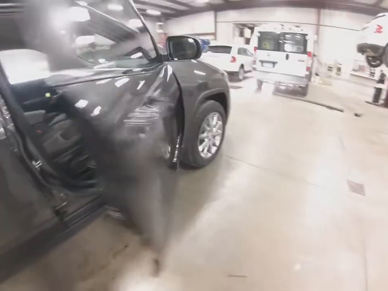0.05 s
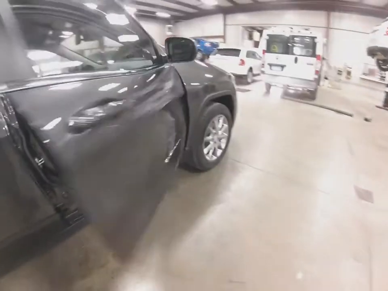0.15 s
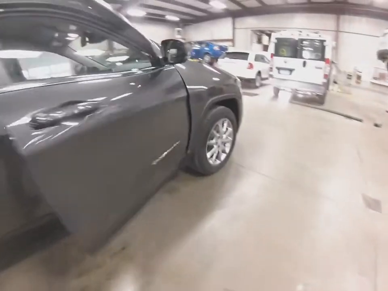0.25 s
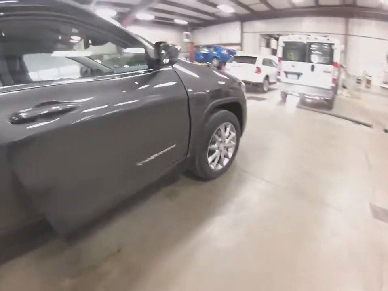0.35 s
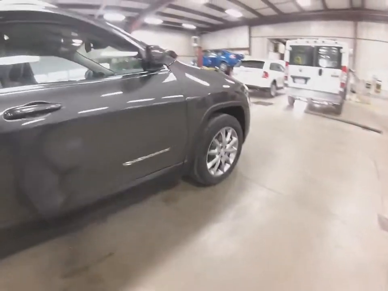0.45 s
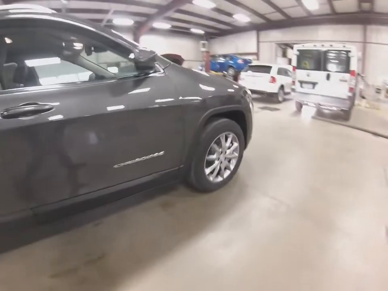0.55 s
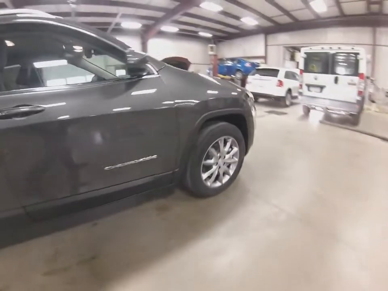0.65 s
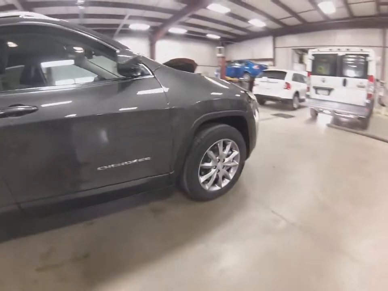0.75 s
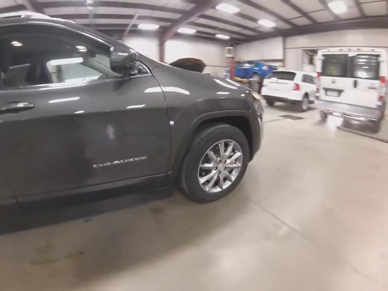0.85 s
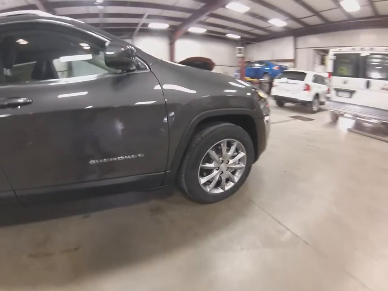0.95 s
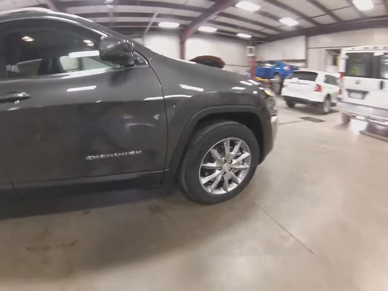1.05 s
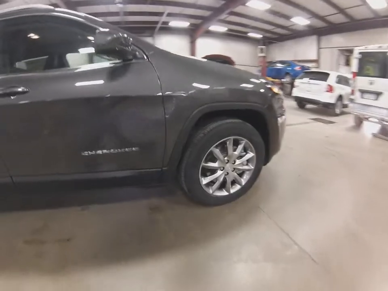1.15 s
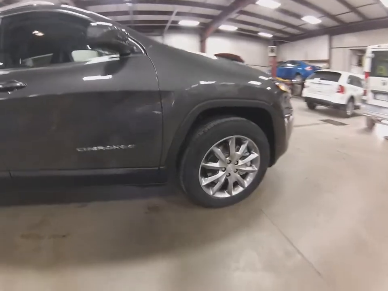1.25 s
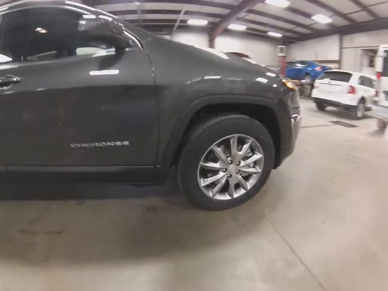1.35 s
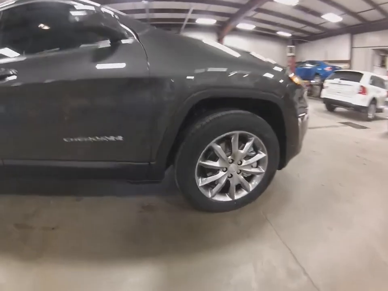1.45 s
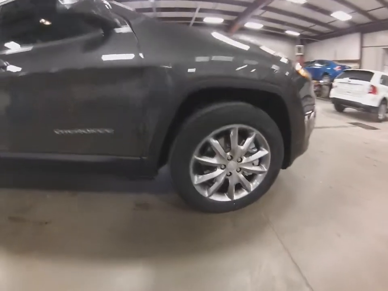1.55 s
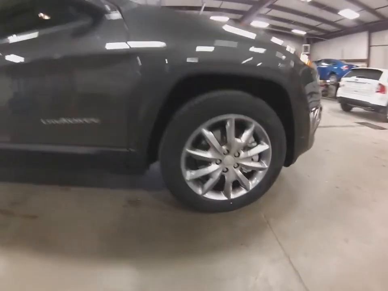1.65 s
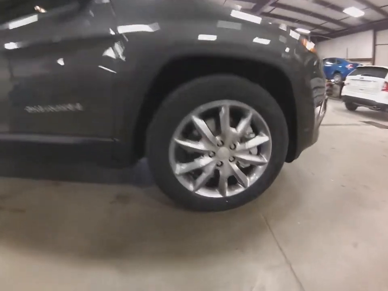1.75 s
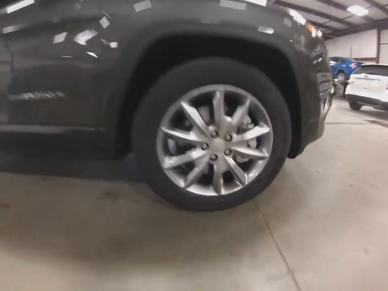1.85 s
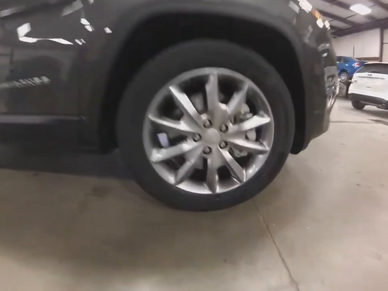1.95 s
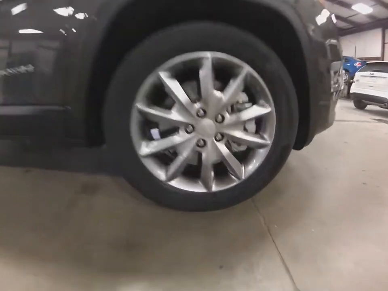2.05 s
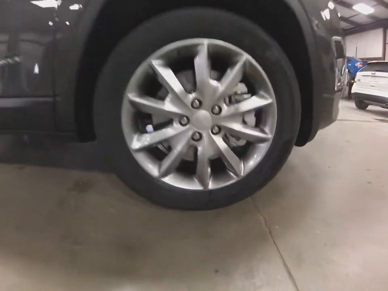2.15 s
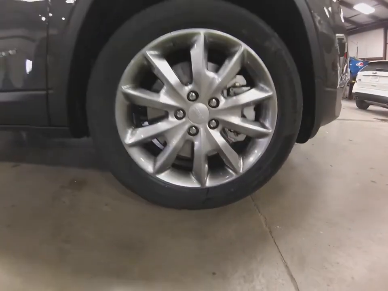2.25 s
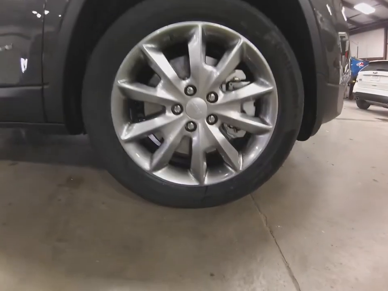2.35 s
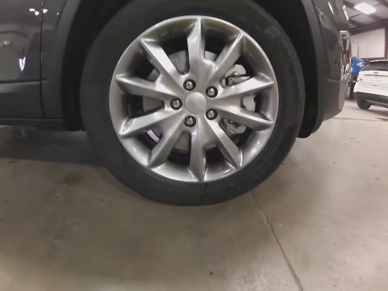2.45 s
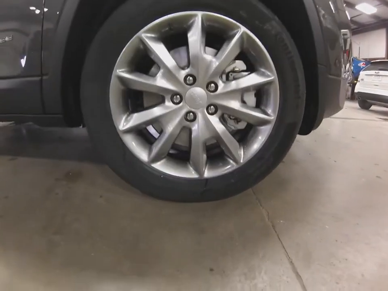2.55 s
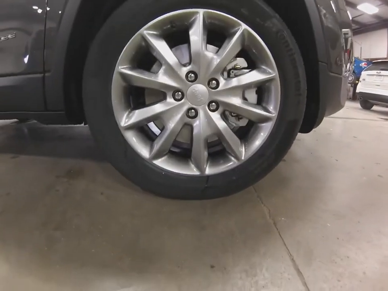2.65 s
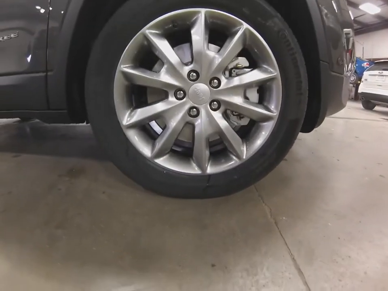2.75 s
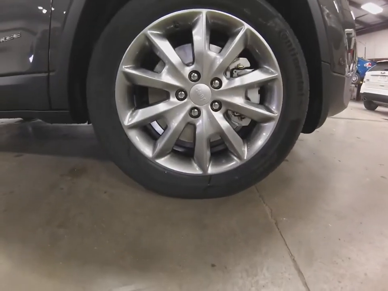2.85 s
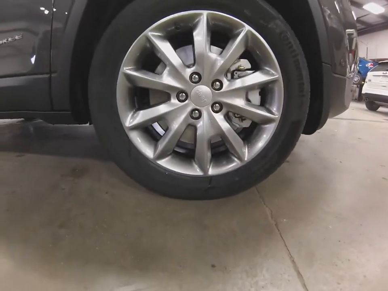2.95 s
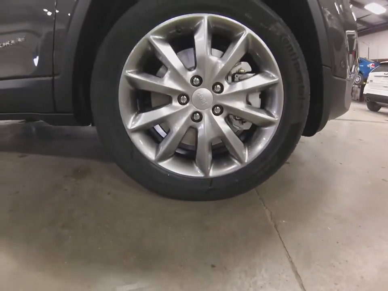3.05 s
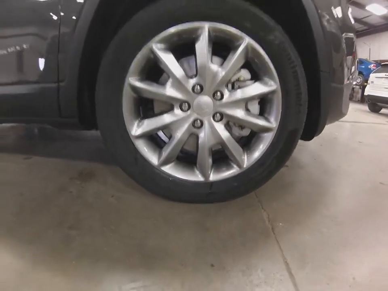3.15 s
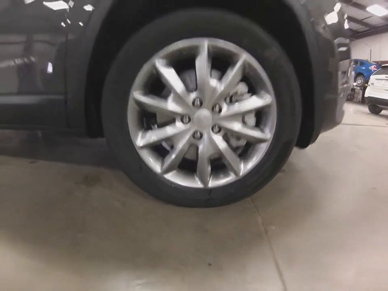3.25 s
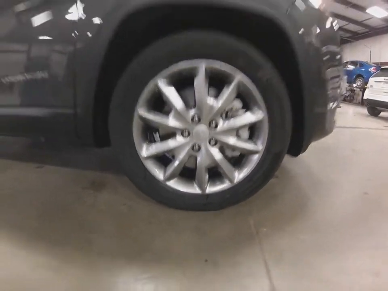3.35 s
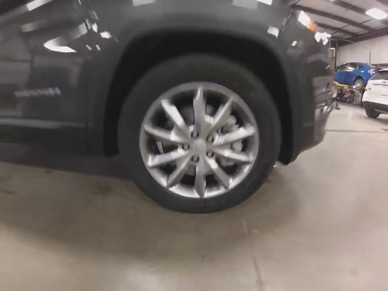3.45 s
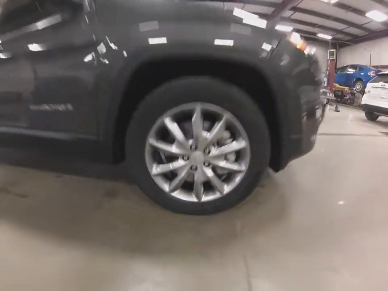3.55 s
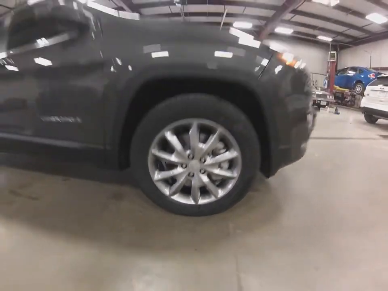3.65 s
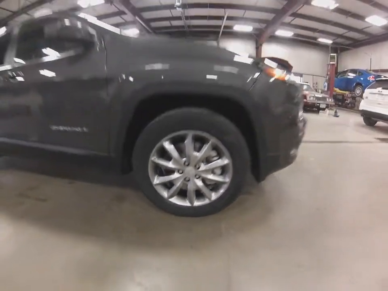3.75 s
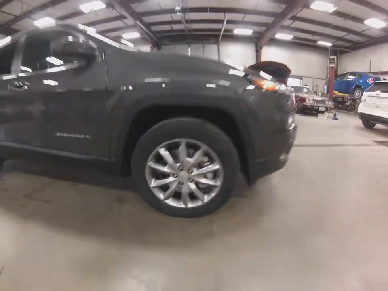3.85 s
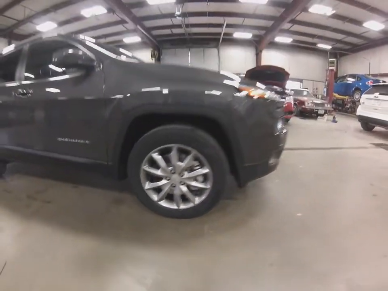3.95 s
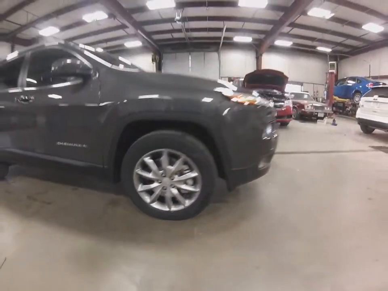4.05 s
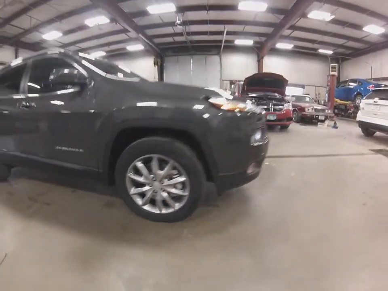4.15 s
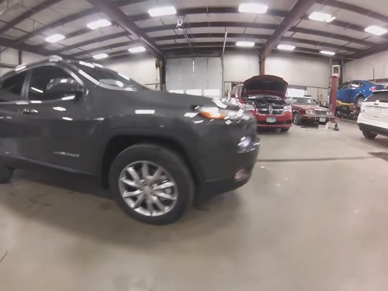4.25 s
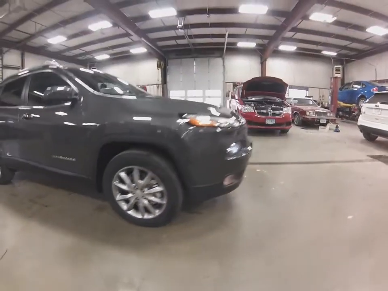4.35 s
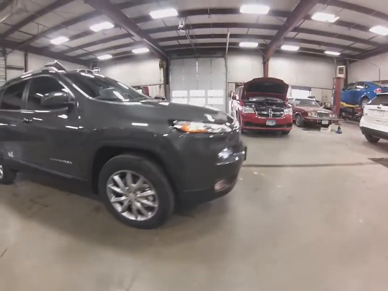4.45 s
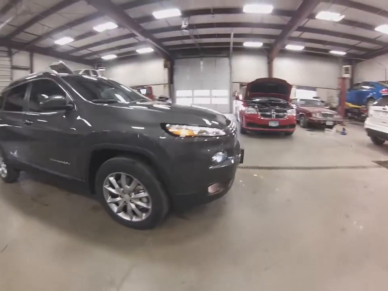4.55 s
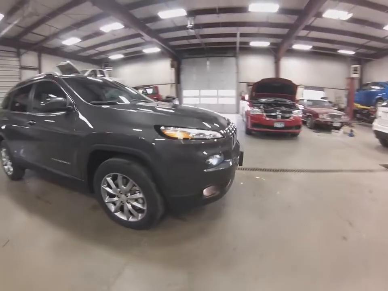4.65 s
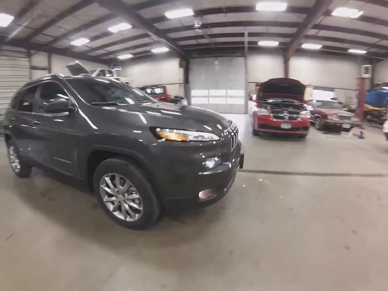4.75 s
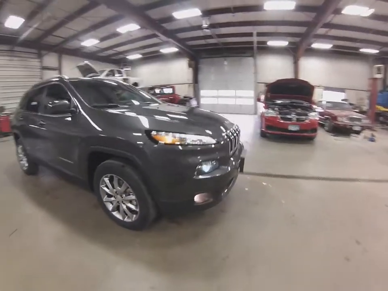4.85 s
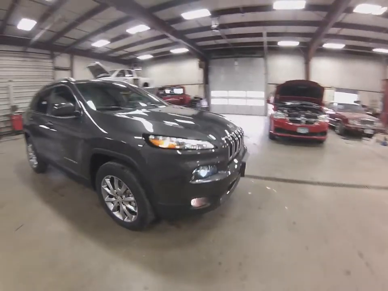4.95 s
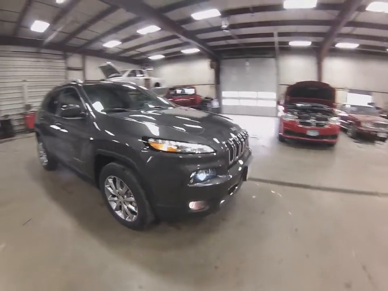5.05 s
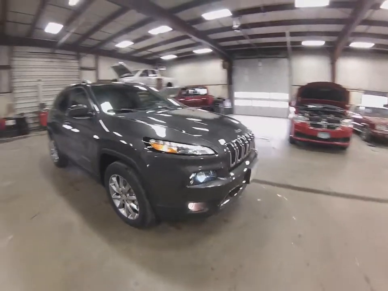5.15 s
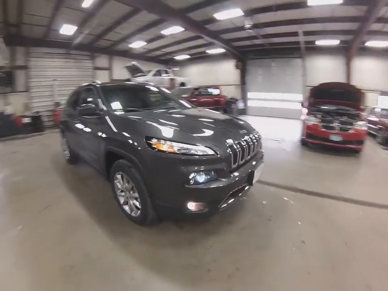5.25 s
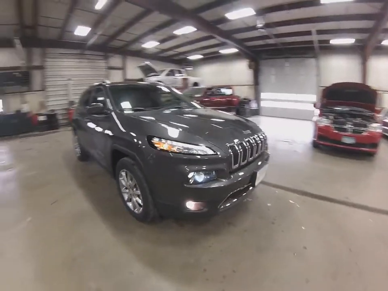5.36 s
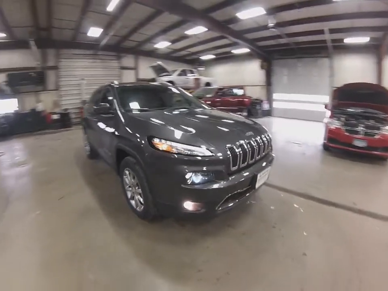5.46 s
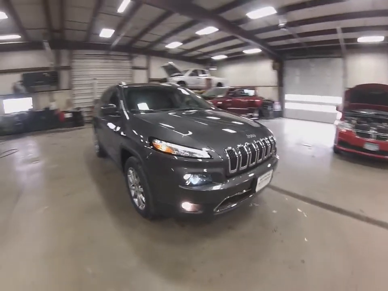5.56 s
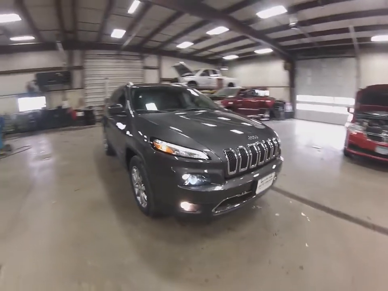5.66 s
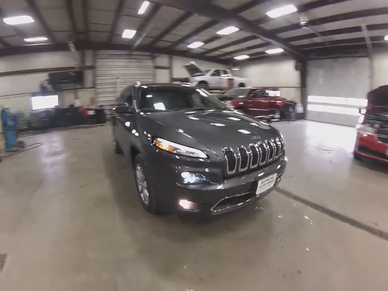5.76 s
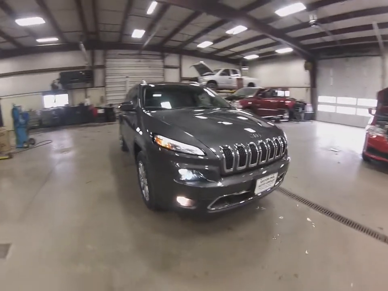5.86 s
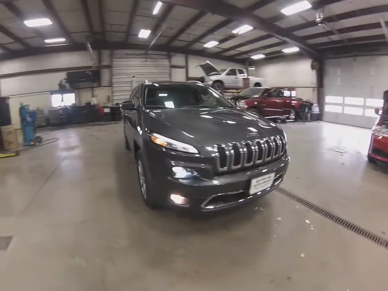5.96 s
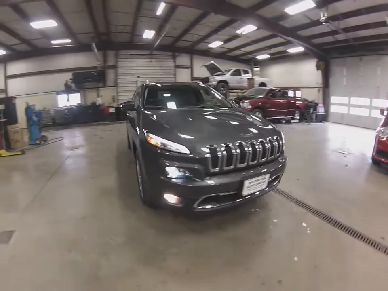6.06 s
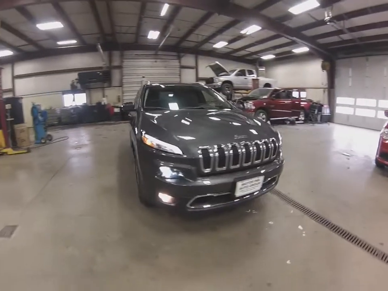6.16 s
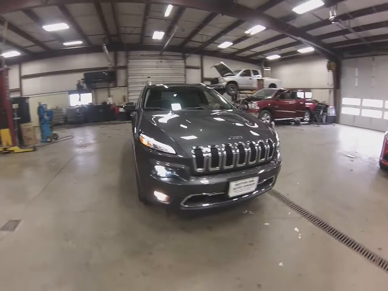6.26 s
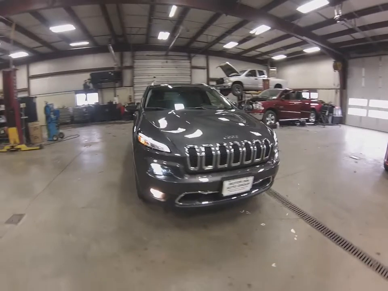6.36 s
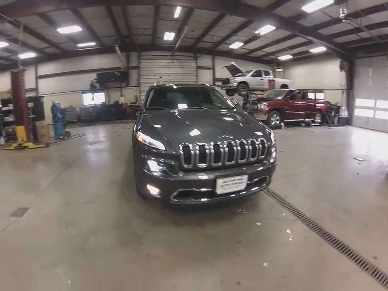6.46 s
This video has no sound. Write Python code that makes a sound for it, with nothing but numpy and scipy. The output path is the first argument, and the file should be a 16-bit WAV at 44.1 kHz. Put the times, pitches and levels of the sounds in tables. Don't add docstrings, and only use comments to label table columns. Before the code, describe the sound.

A car door slams with a hard, clipped thud in a large workshop, then an idling engine hisses and ticks nearby amid clinking keys and bumps.

```python
import sys
import numpy as np
from scipy import signal
from scipy.io import wavfile
from scipy.ndimage import uniform_filter1d

SR = 44100
rng = np.random.default_rng(int(sys.argv[2]) if len(sys.argv) > 2 else 0)


def boost(x):
    u = np.asarray(x, float) / 20
    return 10 ** u


def transcribe(u):
    v = np.clip(np.atleast_2d(u).T, -1, 1)
    q = np.round(v * 32767).astype(np.int16)
    wavfile.write(sys.argv[1], SR, q)


N = 287046

# frequency in Hz, rms level in dB.
HALL_HUM = [(431, -64), (600, -65.5)]
# frequency in Hz, density in dB per Hz.
RUMBLE_SPECTRUM = [(12, 5.5), (25, -7), (60, -0.5), (100, -12.5), (160, -14.5), (250, -45), (400, -17)]
# frequency in Hz, density in dB per Hz.
HALL_SPECTRUM = [(120, -21), (180, -4.5), (300, -5.5), (430, -10.5), (520, -23), (620, -12.5), (800, -21),
                 (1200, -9), (1800, -16), (3000, -20), (5000, -20), (7500, -27.5), (11000, -31.5),
                 (15500, -32)]
HALL_DB, SHADOW_DB, RUMBLE_DB, RUMBLE_FADE_DB_PER_S = -49.5, -1, -41, -0.23
ECHO_T60_S, ECHO_DB, ECHO_CUT_HZ = .7, -28, 300

# time in seconds, engine bay level in dB.
WALK = [
    (0, -52.5),
    (.8, -50.5),
    (1.6, -46.5),
    (2.2, -42.5),
    (3.45, -43.5),
    (3.85, -49),
    (4.5, -52),
    (5.2, -56),
    (6, -53.5),
    (6.51, -55),
]
NEAREST_DB = -43
BRIGHT_DB_PER_OCTAVE, BRIGHT_LOSS_PER_DB = 0.85, 0.2855

FIRING_HZ = 37.53
PHASE_SCATTER_CYCLES = .15
# firing order, rms level close by in dB, share of the bay's fall with distance.
BLOCK = [(3, -41, 0.79), (5, -51, 1)]
# firing order, level against order 3 in dB.
FOLLOWERS = [(.5, -16), (1.5, -12), (2, -4.0), (2.5, -14), (3.1667, -13), (3.5, -14), (4, -14), (7, -21),
             (7.5, -13), (15.36, -21)]
# time in seconds, rms level in dB.
GRILLE = [(0, -59.5), (.5, -57), (1, -70.5), (2, -53.5), (2.65, -62), (3.6, -51), (4.3, -56.5),
          (5.2, -49.5), (5.6, -57.5), (6, -48), (6.51, -48.5)]
EXHAUST_DB, EXHAUST_FADE_DB_PER_S = -38.5, -0.44

# frequency in Hz, density in dB per Hz.
BAY_SPECTRUM = [(160, -53), (220, -8.5), (350, -15), (600, -5), (950, -8.5), (1450, -10.5), (2200, -12),
                (3200, -13), (5000, -18.5), (7000, -27.5), (8500, -37), (10500, -27), (13500, -27.5),
                (15500, -28)]
# frequency in Hz, width in Hz, level in dB.
BAY_RINGS = [(600, 40, -15), (800, 35, -17), (1130, 50, -15), (1465, 40, -11), (1800, 40, -16),
             (2100, 40, -18), (3080, 130, -13), (7750, 50, -29)]
FIRST_TICK_S, TICK_DB, WEAK_TICK_DB, TICK_T60_S = .099, -1.5, -3.5, .04

# time in seconds, peak in dB, frequency in Hz, t60 in seconds.
THUMPS = [(3.481, -29, 45, .16), (3.611, -25, 32, 0.22), (4.251, -18, 46.2, .2), (4.322, -11.5, 75, 0.047),
          (4.411, -21.5, 54.7, 0.1), (4.537, -18.5, 50, 0.085), (4.879, -41, 70.5, .15),
          (5.488, -25, 56, .15), (5.577, -23, 60, 0.089), (5.789, -23, 50.4, 0.12), (6.115, -21.5, 73, .11)]
# time in seconds, peak in dB, frequency in Hz.
TAPS = [(0.647, -28, 131), (.695, -31, 153), (1.734, -45, 350), (4.283, -22, 139), (4.2965, -23, 210),
        (4.305, -26, 147), (4.352, -25.5, 120), (4.370, -30.5, 236), (4.388, -29, 174), (4.435, -31, 240),
        (4.49, -44, 162), (5.55, -32, 170), (6.135, -26.5, 148), (6.15, -38, 210)]
TAP_T60_CYCLES = 8.3
# time in seconds, peak in dB, frequency in Hz.
CLINKS = [
    (1.6342, -40, 9800),
    (2.6374, -30, 10070),
    (2.6374, -49, 9700),
    (2.6374, -50, 14000),
    (3.0594, -37, 9750),
    (3.073, -47, 9800),
    (3.073, -42, 8050),
    (3.073, -49, 11200),
]
# time in seconds, peak in dB, frequency in Hz.
CHIMES = [
    (3.056, -44, 11500),
    (3.2094, -45, 12000),
    (3.25, -59, 8600),
]
CLINK_T60_S, CHIME_T60_S = 0.09, .3
# frequency in Hz, level in dB, t60 in seconds.
RATTLE_MODES = [(5670, 1, .014), (6300, 1, 0.013), (7300, -9, .01), (8600, -10, .01), (13200, -12, .01)]
RATTLE_S, RATTLE_GAP_S, RATTLE_PEAK_S = 6.104, .0165, 6.187
RATTLE_DB, RATTLE_FALL_DB_PER_S = -43, 130.0

# time in seconds, level in dB, t60 in seconds, low edge in Hz, high edge in Hz.
CRACKS = [(0.527, -32, 0.052, 1900, 3630), (0.5265, -29, 0.076, 447, 1200),
          (0.5373, -21, 0.024, 2490, 8800), (0.544, -22.5, 0.043, 500, 1540),
          (0.541, -33, 0.028, 1800, 11000), (0.549, -38, 0.03, 1500, 12000), (0.555, -37.5, 0.34, 300, 800),
          (4.28, -53, 0.67, 250, 2200), (.558, -54, 1, 450, 2380), (6.10, -60, 0.56, 4500, 9000),
          (6.17, -59, 0.63, 4500, 8000)]
# frequency in Hz, width in Hz, rms level in dB.
JINGLE_RINGS = [(5750, 400, -70), (8650, 400, -68), (12100, 400, -70)]
# start, peak and end in seconds.
SWING_S = (.42, .48, .56)

# frequency in Hz, level in dB, t60 in seconds.
LATCH_MODES = [(1350, -16, 0.019), (1437, -17.5, 0.054), (1730, -19, 0.014), (800, -21.5, .06),
               (516, -14, 0.041)]
# time in seconds, level in dB.
LATCH_HITS = [
    (.5254, -8),
    (.5261, -3),
    (.5268, -1),
    (.5282, -5),
    (.5342, -9),
]
# time in seconds, height, length in milliseconds.
PUSHES = [
    (.5318, .3, 9.5),
    (.5391, -.95, 2.2),
    (.5416, -.5, 1.9),
    (.5502, .24, 8.5),
    (.567, -.08, 10.0),
    (.585, .15, 10.0),
    (1.7329, -.055, .6),
    (1.7335, .04, 1.3),
]
SEAL_S, SEAL_DAMPING_S = .5391, .006
# frequency in Hz, level in dB, t60 in seconds.
BODY_MODES = [(32, -9.5, 0.2), (60, -42, 0.24), (120, -33, 0.15), (192.4, -34, 0.83), (306, -26, 0.19),
              (400, -24, 0.11), (551, -23.5, 0.084), (737, -12.5, 0.028)]
# time in seconds, peak in dB.
WOBBLE = [
    (.604, -18),
    (0.639, -31),
    (.676, -15.5),
    (0.724, -11.5),
    (0.78, -16.5),
    (0.812, -21),
]
WOBBLE_HZ, SAG_HZ_PER_S, WOBBLE_T60_S = 54, 63, 0.13

DUCK_DB, DUCK_S, HOLD_S, RECOVER_S = -4.5, 0.563, 0.061, 0.028
CUTOFF_HZ, PART_SAMPLES = 15400, 1024
PART_SHARE, PART_LOW_DB, PART_HIGH_DB = 0.33, -34.5, -23
PART_START_S, PART_END_S = .53, .76


def rms_one(x):
    return x / np.sqrt(np.mean(x ** 2) + 1e-20)


def in_time(rows):
    s, *columns = np.transpose(rows)
    return [np.interp(np.arange(N) / SR, s, c) for c in columns]


def drift(rate):
    r = np.exp(-80 * np.pi * rate / SR)
    white = rng.standard_normal(N // 40 + 2002)
    slow = signal.lfilter([1], [1, -2 * r, r * r], white)[2000:]
    return np.interp(np.arange(N) / 40, np.arange(len(slow)), rms_one(slow - slow.mean()))


def filtered(x, order, hz, kind):
    return signal.sosfilt(signal.butter(order, hz, kind, fs=SR, output="sos"), x)


def resonate(x, hz, width_hz):
    r = np.exp(-np.pi * width_hz / SR)
    return rms_one(signal.lfilter([1, 0, -1], [1, -2 * r * np.cos(2 * np.pi * hz / SR), r * r], x))


def add_ring(out, s, db, hz, t60_s, rise_cycles=0.0, phase=0):
    start = round(s * SR)
    t = np.arange(min(int(t60_s * 1.5 * SR), N - start)) / SR
    swell = 1 - np.exp(-t * hz / max(rise_cycles, 1e-3))
    out[start:start + len(t)] += boost(db - 60 * t / t60_s) * swell * np.sin(2 * np.pi * hz * t + phase)


def banded_noise(spectrum, patchy_db, tilt_db=0):
    together, white = drift(1.4), rng.standard_normal((2, N))
    hz, db = np.transpose(spectrum)
    edges_hz = np.geomspace(hz[0], hz[-1], round(2.5 * np.log2(hz[-1] / hz[0])) + 1)
    out, power = 0, 0
    for k, (low_hz, high_hz) in enumerate(zip(edges_hz, edges_hz[1:])):
        band = filtered(white[k % 2], 2, [low_hz, high_hz], "band")
        middle_hz = np.sqrt(low_hz * high_hz)
        level_db = np.interp(np.log(middle_hz), np.log(hz), db)
        power += boost(2 * level_db) * np.mean(band ** 2)
        flicker_db = patchy_db * (0.3 * together + drift(14.5))
        out = out + band * boost(level_db + tilt_db * np.log2(middle_hz / 2000) + flicker_db)
    return out / np.sqrt(power)


def hall_hum():
    out = np.zeros(N)
    for hz, db in HALL_HUM:
        phase = 2 * np.pi * np.cumsum(hz * (1 + 0.0022 * drift(3.2))) / SR
        out += np.sqrt(2) * boost(db + 4 * drift(3.3)) * np.sin(phase)
    return out


def hall_noise(bay_db):
    hall_db = HALL_DB + SHADOW_DB * boost(bay_db - NEAREST_DB)
    rumble_db = RUMBLE_DB + RUMBLE_FADE_DB_PER_S * np.arange(N) / SR
    hall = boost(hall_db) * banded_noise(HALL_SPECTRUM, patchy_db=0.9)
    return hall + boost(rumble_db) * banded_noise(RUMBLE_SPECTRUM, patchy_db=1.0)


def workshop_echo(x):
    t = np.arange(int(ECHO_T60_S * SR)) / SR
    dull = filtered(rng.standard_normal(len(t)), 2, [60, ECHO_CUT_HZ], "band")
    tail = dull * boost(-60 * t / ECHO_T60_S) * (t > .02)
    return boost(ECHO_DB) * signal.fftconvolve(x, tail / np.sqrt(np.sum(tail ** 2)))[:N]


def engine_tones(bay_db):
    turn = 2 * np.pi * np.cumsum(FIRING_HZ * (1 + 0.0023 * drift(2.76))) / SR
    block = [(round(k), db + share * (bay_db - NEAREST_DB)) for k, db, share in BLOCK]
    orders = [(1, EXHAUST_DB + EXHAUST_FADE_DB_PER_S * np.arange(N) / SR), *block, (8, *in_time(GRILLE))]
    orders += [(k, block[0][1] + db) for k, db in FOLLOWERS]
    out = np.zeros(N)
    for k, db in orders:
        phase = 2 * np.pi * PHASE_SCATTER_CYCLES * rng.uniform(-1.42, 1)
        out += np.sqrt(2) * boost(db + 1.3 * drift(7.2)) * np.sin(k * turn + phase)
    return out


def engine_bay(bay_db):
    tilt_db = BRIGHT_DB_PER_OCTAVE + BRIGHT_LOSS_PER_DB * (bay_db - NEAREST_DB)
    hiss = banded_noise(BAY_SPECTRUM, patchy_db=1.05, tilt_db=tilt_db)
    white = rng.standard_normal(N)
    nearness_db = .5 * (bay_db - bay_db.max())
    for hz, width_hz, db in BAY_RINGS:
        hiss += boost(db + nearness_db + 0.94 * drift(1.8)) * resonate(white, hz, width_hz)
    at_s = np.arange(FIRST_TICK_S, N / SR, 2 / FIRING_HZ)
    weak = np.arange(len(at_s)) % 2
    marks = np.zeros(N)
    marks[(at_s * SR).astype(int)] = boost(TICK_DB + WEAK_TICK_DB * weak + 2.5 * rng.standard_normal(len(at_s)))
    gate = signal.lfilter([1], [1, -boost(-60 / (TICK_T60_S * SR))], marks + 1e-18)
    ticks = filtered(gate * white[::-1], 3, [12200, 16500], "band")
    return boost(bay_db) * (hiss + ticks)


def knocks():
    out = np.zeros(N)
    rows = [(s, db, WOBBLE_HZ - SAG_HZ_PER_S * (s - WOBBLE[0][0]), WOBBLE_T60_S) for s, db in WOBBLE]
    rows += THUMPS
    rows += [(s, db, hz, TAP_T60_CYCLES / hz) for s, db, hz in TAPS]
    for s, db, hz, t60_s in rows:
        add_ring(out, s, db + 2, hz, t60_s, rise_cycles=0.3, phase=np.pi)
    return out


def keys():
    out = np.zeros(N)
    for rows, t60_s in [(CLINKS, CLINK_T60_S), (CHIMES, CHIME_T60_S)]:
        for s, db, hz in rows:
            add_ring(out, s, db - 10, hz, t60_s, rise_cycles=3.0)
            add_ring(out, s, db - 12, hz * 1.008, t60_s * 0.44, rise_cycles=3.0)
    return out


def rattle():
    out = np.zeros(N)
    for k, spread in enumerate(rng.standard_normal((9, len(RATTLE_MODES)))):
        s = RATTLE_S + RATTLE_GAP_S * (k + .12 * spread[-1])
        hit_db = RATTLE_DB - RATTLE_FALL_DB_PER_S * abs(s - RATTLE_PEAK_S)
        for (hz, mode_db, t60_s), chance in zip(RATTLE_MODES, spread):
            db = hit_db + mode_db + 2.2 * chance
            add_ring(out, s, db, hz * (1 + .03 * chance), t60_s, rise_cycles=3.0)
    return out


def cracks():
    t, white, out = np.arange(N) / SR, rng.standard_normal(N), np.zeros(N)
    for s, db, t60_s, low_hz, high_hz in CRACKS:
        start = round(s * SR)
        age_s = t[:min(int(t60_s * SR), N - start)]
        band = filtered(white[start:start + len(age_s)], 2, [low_hz, min(high_hz, .45 * SR)], "band")
        attack = np.clip(age_s / 0.0024, 0, 1)
        out[start:start + len(age_s)] += boost(db - 60 * age_s / t60_s) * attack * rms_one(band)
    jingle = np.zeros(N)
    for hz, width_hz, db in JINGLE_RINGS:
        jingle += boost(db) * resonate(resonate(white, hz, width_hz), hz, width_hz)
    return out + np.sqrt(np.interp(t, SWING_S, [0, 1, 0])) * jingle


def door():
    out = np.zeros(N)
    for s, hit_db in LATCH_HITS:
        for hz, db, t60_s in LATCH_MODES:
            add_ring(out, s, db + hit_db, hz, t60_s, rise_cycles=0.28)
    out *= np.exp(-np.clip(np.arange(N) / SR - SEAL_S, 0, 1) / SEAL_DAMPING_S)
    for s, height, ms in PUSHES:
        bump = height * np.hanning(int(ms * SR / 1000))
        start = round(s * SR)
        out[start:start + len(bump)] += bump
    for hz, db, t60_s in BODY_MODES:
        add_ring(out, SEAL_S, db, hz, t60_s, rise_cycles=.00035 * hz, phase=-np.pi / 2)
    return out


def gain_control():
    t = np.arange(N) / SR
    onset = np.clip((t - DUCK_S) / 0.022, 0, 1)
    since_s = np.clip(t - DUCK_S - HOLD_S, 0, None)
    return boost(DUCK_DB * onset * np.exp(-since_s / RECOVER_S))


def scene():
    bay_db, = in_time(WALK)
    steady = hall_hum() + hall_noise(bay_db) + engine_tones(bay_db) + engine_bay(bay_db)
    slam = door()
    mid = gain_control() * (steady + workshop_echo(slam))
    mid += knocks() + keys() + rattle() + cracks() + slam
    return np.array([mid, mid])


def low_pass(x):
    return signal.sosfilt(signal.butter(12, 16300, fs=SR, output="sos"), x)


def record(dry):
    mid = np.clip(dry[0], -1, 1)
    stretches = np.arange(N // PART_SAMPLES + 2)
    start_s = stretches * PART_SAMPLES / SR
    at_slam = (start_s > PART_START_S) & (start_s < PART_END_S)
    parted = (rng.random(len(stretches)) < PART_SHARE) | at_slam
    gate = uniform_filter1d(np.repeat(parted * 1., PART_SAMPLES)[:N], size=256)
    late = np.roll(mid, 290)
    lows = filtered(late, 2, 280, "low")
    highs = filtered(late, 2, 3000, "high")
    side = gate * (boost(PART_LOW_DB) * lows + boost(PART_HIGH_DB) * highs + boost(-25) * late)
    top_cut = signal.cheby2(18, 85, CUTOFF_HZ + 480, fs=SR, output="sos")
    return low_pass(signal.sosfilt(top_cut, [mid + side, mid - side]))


dry = scene()
out = record(dry)
transcribe(out)
```